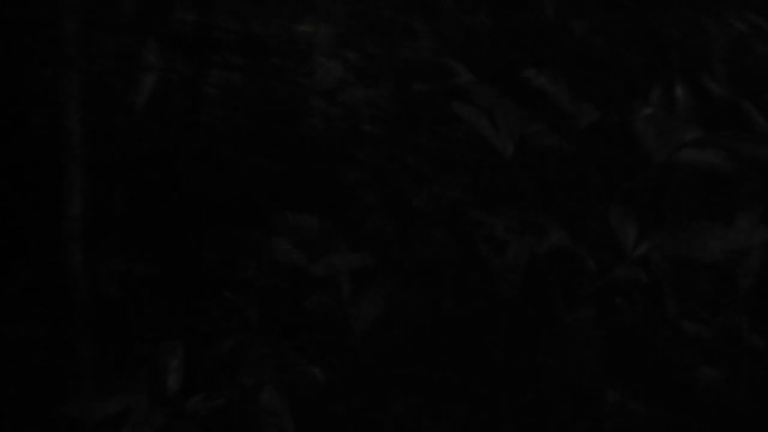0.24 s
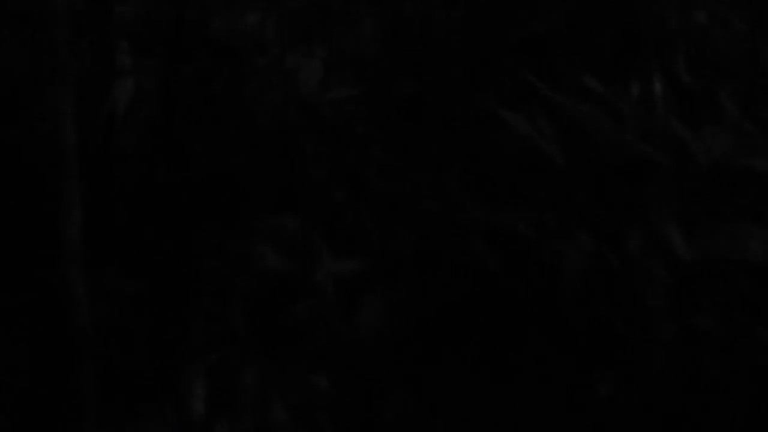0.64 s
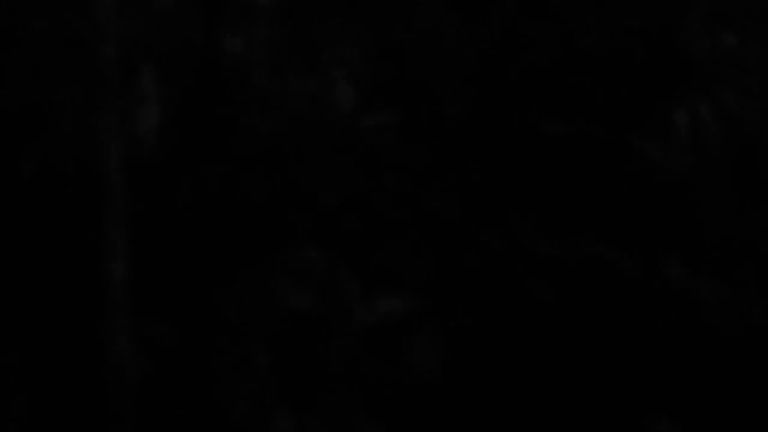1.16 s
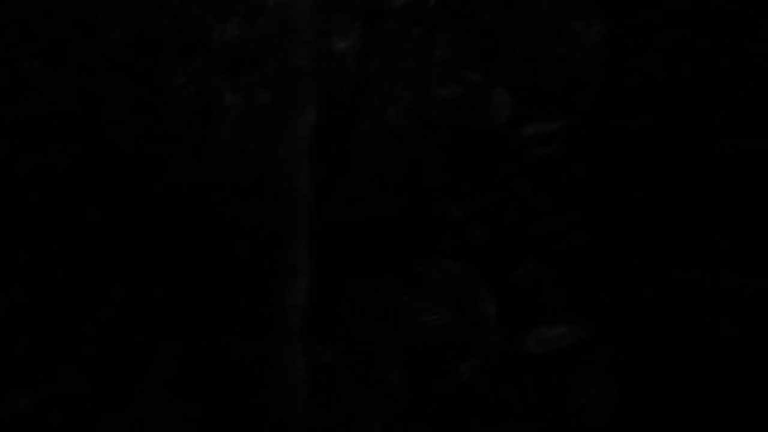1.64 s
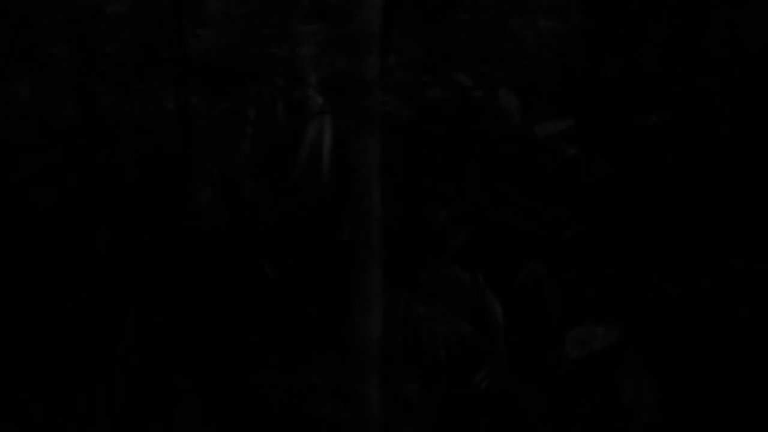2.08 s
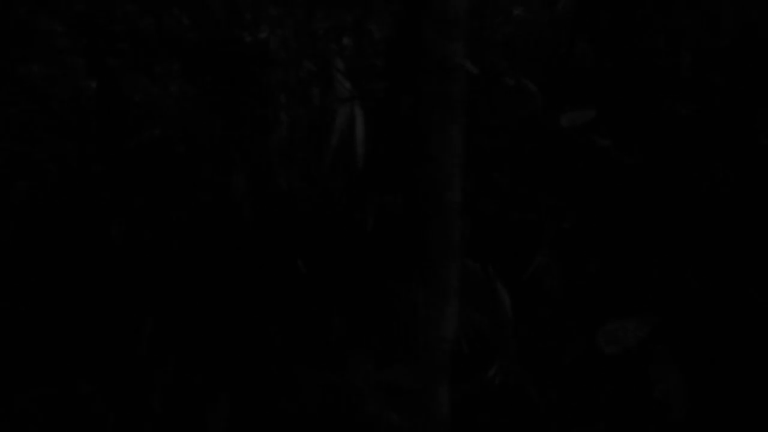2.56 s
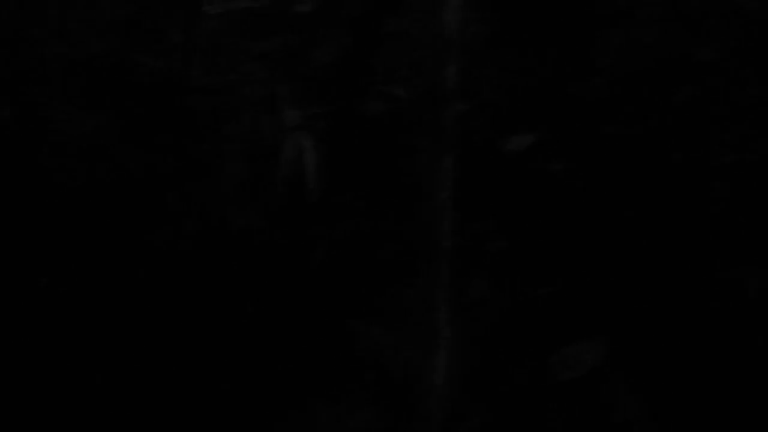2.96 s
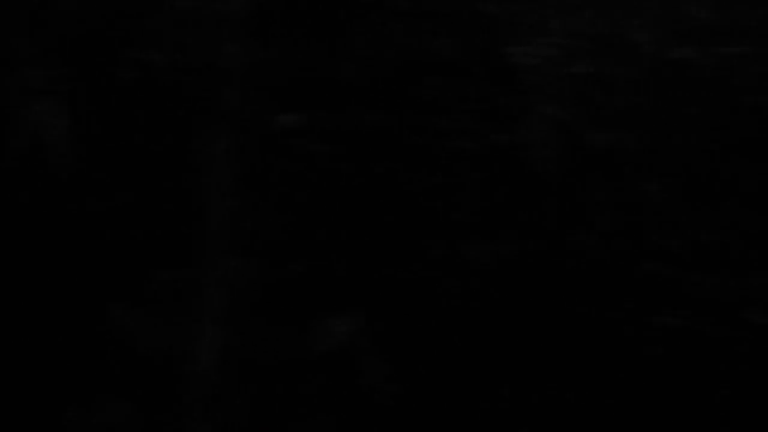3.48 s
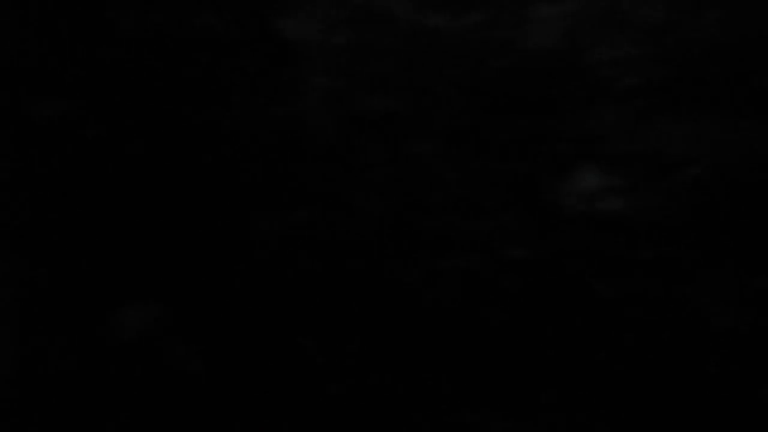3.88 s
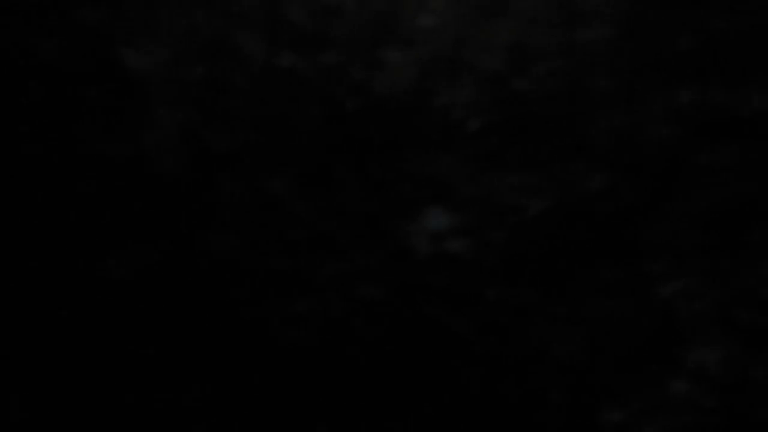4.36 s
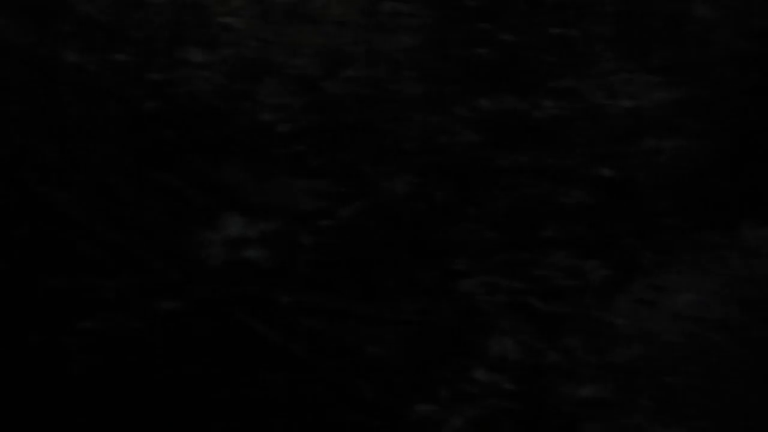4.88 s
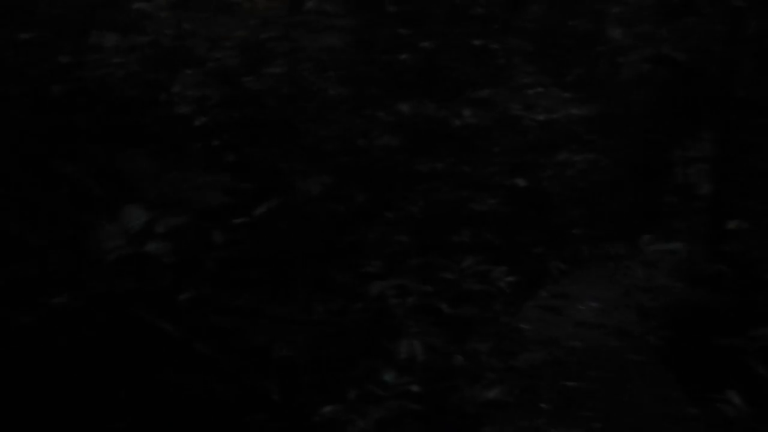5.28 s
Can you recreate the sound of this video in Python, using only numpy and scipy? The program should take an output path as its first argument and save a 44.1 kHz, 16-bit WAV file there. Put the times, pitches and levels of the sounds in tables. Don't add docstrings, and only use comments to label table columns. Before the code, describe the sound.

A near cricket trills loudly in a night rainforest, then stops, leaving fainter crickets, high chirps, hiss and small twig clicks.

```python
import sys
import numpy as np
from scipy import signal
from scipy.io import wavfile
from scipy.ndimage import uniform_filter1d

SR = 44100
rng = np.random.default_rng(int(sys.argv[2]) if len(sys.argv) > 2 else 0)


def natural_amplitude(level_db):
    exponent = np.asarray(level_db, float) / 20
    return 10 ** exponent


def digitize_waveform(pressure):
    field = np.atleast_2d(pressure).T
    bounded = np.clip(field, -1, 1)
    quanta = np.round(bounded * 32767).astype(np.int16)
    wavfile.write(sys.argv[1], SR, quanta)


N = 244314
STEP = 20
SLOW_T = np.arange(N // STEP + 1) * STEP / SR
TIME = np.arange(N) / SR

NEAR_HZ, NEAR_STROKES, NEAR_STOP_S = 4255, 92.4, 3.315
FAR_HZ, HIGH_HZ = 4270, 7050
SOUND_M_PER_S = 343
FAR_JOIN_S, FAR_HUSH_DB = 3.1, -2
TREBLE_SHARE, LOW_SHARE = 0.98, 0.55
CALM_DB = -97

# (time [s], frequency [Hz])
NEAR_WING = [(0, 4265.5), (1, 4258), (3.3, 4240.5)]
# (time [s], level [dB])
NEAR_LEVEL = [(0, -1), (.5, 0), (.8, -0.5), (1, 2), (1.4, 1.5), (1.95, 2.5), (2.5, 1), (2.75, 4),
              (2.95, 1.5), (3.3, 4)]
# (line number [1], level [dB])
NEAR_LINES = [(-3, -47), (-2, -36), (-1, -27.3), (0, -23), (1, -24), (2, -29), (3, -35.5), (4, -45),
              (5, -50), (6, -53)]
# (time [s], level [dB])
OVERTONE = [(0.0, -55), (0.51, -50), (0.58, -53), (2.57, -36), (3.31, -42.5)]
# (extra path [m], closing speed [m/s], level [dB])
PATHS = [(0.0341, -0.0179, -21.3), (0.0707, 0.0835, -18.5), (0.1168, -0.155, -18.0), (0.191, 0.1765, -13.8),
         (0.2062, 0.0617, -12.4), (0.2476, -0.4447, -23.6), (0.3266, 0.0049, -9.5), (0.3674, 0.1214, -9.1),
         (0.3717, 0.1447, -20.3), (0.3919, 0.2777, -20.1), (0.3967, -0.1072, -18.3),
         (0.4098, 0.2202, -21.5), (0.5744, 0.2597, -21.9), (0.6966, -0.0373, -17.5),
         (0.7187, -0.2595, -19.1), (0.7885, -0.3066, -17.9), (0.8718, 0.1924, -21.6),
         (1.0887, -0.3901, -22.0), (1.3211, 0.0947, -20.4), (1.3903, -0.0699, -17.9),
         (1.8104, -0.1477, -21.4), (1.8676, -0.2055, -19.0), (1.9497, 0.0037, -19.8),
         (2.5473, -0.415, -23.1), (2.6392, -0.1615, -14.6), (2.7509, -0.1703, -12.6),
         (2.7623, 0.0214, -20.6), (2.8664, -0.0308, -19.8), (2.9862, -0.304, -23.3),
         (3.6221, 0.0388, -12.5)]
# (wing tone [Hz], strokes [1/s], level before turn [dB], level after [dB], turn [s])
FAR = [
    (4258, 91.5, 0, -12, 4.4),
    (4290, 97, -1, -6, 4.6),
    (4226, 96.5, -7, 0, 4.5),
    (4285, 93, -6, -3, 4.2),
]
# (time [s], level [dB])
FAR_EARLY = [(0, -24.5), (1, -26), (2, -27), (3, -29)]
# (time [s], level [dB])
FAR_LATE = [(3.4, -26.5), (3.41, -28.5), (3.86, -26), (4.71, -31.5), (4.8, -30), (4.92, -34.5), (5.07, -33),
            (5.54, -35.5)]
# (time [s], half of left-right difference [dB])
FAR_PAN = [(3, -2), (3.5, 0.4), (4.25, -1), (4.45, 3), (4.8, 1.5), (5, 0.5), (5.3, 2)]
# (time [s], lower line level [dB], upper line level [dB])
LOW = [(0.0, -43, -42.5), (0.08, -41.5, -57), (0.35, -38, -44), (0.52, -44, -49), (1.27, -39, -40),
       (1.39, -42, -37), (1.82, -40, -43.5), (2.25, -43.5, -44.5), (2.84, -42, -46.5), (2.93, -50.5, -48.5),
       (3.39, -48, -48.5), (3.56, -62, -46), (3.66, -45, -41), (4.47, -54, -43.5), (4.72, -49, -40.5),
       (5.06, -50, -49.5), (5.52, -44, -43.5), (5.54, -51, -46)]
# (time [s], frequency [Hz])
LOW_TONE = [(0, 1577.9), (3.1, 1577.9), (3.4, 1580.2)]
# (wing tone [Hz], left-right at start [dB], drift [dB/s])
CALLERS = [
    (6850, .5, -.75),
    (6890, 1, -.6),
    (7060, -.8, -.55),
    (7205, 4.5, -1.5),
]
# (time [s], length [s], level [dB])
LOWEST = [
    (0, 0.034, -51),
    (0.399, 0.12, -35),
    (1.01, 0.13, -33.5),
    (1.26, 0.27, -38),
    (1.48, .09, -37),
    (2.2, 0.16, -41),
    (3.64, 0.096, -37.5),
    (4.299, 0.3, -34),
    (4.806, .13, -34.5),
    (4.979, 0.076, -28),
]
# (time [s], length [s], level [dB])
LOUDEST = [
    (0.628, 0.044, -30.5),
    (.83, 0.064, -26.5),
    (1.811, 0.071, -26.5),
    (2.02, .16, -29),
    (2.689, 0.11, -26),
    (3.05, 0.13, -28.5),
    (3.518, 0.1, -26.5),
    (4.02, 0.051, -30),
    (4.19, 0.092, -24),
    (5.37, 0.15, -31.5),
]
# (time [s], length [s], level [dB])
MIDDLE = [(0, 0.029, -34.5), (.14, 0.058, -35.5), (0.329, 0.12, -32.5), (0.798, 0.095, -31),
          (1.02, 0.082, -33), (1.299, 0.071, -32), (2.29, 0.15, -37.5), (2.48, 0.12, -32.5),
          (2.73, 0.14, -34), (3.09, 0.12, -34), (3.331, 0.14, -29.5), (3.991, 0.13, -31),
          (4.229, 0.185, -32.5), (4.461, 0.088, -28.5), (4.641, 0.22, -53), (4.932, 0.19, -32.5),
          (5.17, 0.17, -28.5), (5.43, 0.1, -43)]
# (time [s], length [s], level [dB])
HIGHEST = [(.12, 0.054, -32.5), (0.571, 0.1, -37), (0.767, 0.057, -31.5), (1.032, 0.16, -36.5),
           (1.51, 0.075, -37), (1.661, 0.15, -31.5), (2.58, 0.22, -36), (2.781, 0.056, -34.5),
           (3.04, 0.11, -30), (3.521, 0.086, -32), (3.801, 0.17, -34.5), (4.129, 0.11, -31),
           (4.47, 0.16, -37), (4.69, 0.15, -36), (5.08, 0.23, -40), (5.43, .11, -37)]
# (time [s], level [dB])
FAINT = [(0, -48), (.3, -46), (.6, -46), (.9, -47), (1.1, -52), (1.3, -75)]
# (frequency [Hz], density [dB/Hz])
HISS = [(40, -40), (90, -39), (130, -14), (250, -1.5), (450, -0.5), (1000, -2.5), (3000, -3.5),
        (3800, -2.5), (5000, -3.5), (5900, -6), (7600, -6), (9500, -10.5), (13000, -16), (15700, -20.5)]
# (frequency [Hz], coherence [1])
SAME = [(60, 0.28), (130, 0.66), (290, 0.94), (640, 0.88), (1410, 0.83), (3100, 0.62), (6820, 0.27),
        (15000, 0.044)]
# (time [s], level [dB])
STIR = [(0, -5), (.21, -1), (1.17, 1.5), (1.5, -1), (1.96, 2), (2.13, -2.5), (2.3, 1.5), (3.9, -0.1),
        (4.94, -3.5), (5.54, 4.5)]
# (time [s], peak level [dB], rise [s], fall [s])
GUSTS = [
    (.21, -53.5, 0.14, 0.33),
    (1.17, -59.5, 0.2, 0.35),
    (1.96, -43.5, 0.15, 0.069),
    (5.5, -72, .6, .3),
]
# (time [s], peak level [dB], pitch [Hz], ring t60 [s])
DRIPS = [(0.198, -28.5, 1000, 0.019), (0.686, -30, 437, 0.03), (0.995, -26, 466, 0.026),
         (1.278, -32, 850, 0.02), (1.338, -29.5, 1060, 0.012), (1.495, -35, 500, 0.025),
         (1.656, -27.5, 430, 0.017), (1.674, -20, 460, 0.019), (1.711, -32, 435, 0.04),
         (1.845, -31, 1260, 0.02), (1.917, -32, 342, 0.025), (2.241, -39, 785, 0.022),
         (2.34, -38, 615, 0.025), (2.637, -30, 458, 0.026), (2.679, -30.5, 910, 0.022),
         (3.346, -34, 440, 0.039), (3.493, -25.5, 270, 0.03), (3.626, -24.5, 383, 0.021),
         (3.814, -33, 1070, 0.021), (4.067, -34, 355, 0.03), (4.13, -37, 483, 0.02),
         (4.782, -33.5, 616, 0.028)]
# (time [s], peak level [dB], pitch [Hz], ring t60 [s])
TICKS = [(1.1004, -24, 3580, 0.0035), (1.2805, -25, 2590, 0.0035), (2.168, -27, 3400, 0.0035),
         (2.324, -22, 3480, 0.0035), (2.554, -24, 2220, 0.0033), (3.376, -10, 3480, 0.0041),
         (3.377, -21, 5140, 0.004), (3.647, -19, 2930, 0.0035), (3.739, -29, 2280, 0.02),
         (3.9893, -26, 3390, 0.0035), (4.444, -22, 2680, 0.0035), (5.343, -20, 2550, 0.0031),
         (5.3926, -30, 3490, 0.0035)]
# (time [s], peak level [dB], rustle relative to it [dB], rustle length [s])
SNAPS = [(0.372, -29, -14, 0.016), (0.4479, -41, -14, 0.03), (0.516, -32, -10.5, 0.033),
         (0.905, -37.5, -17, 0.03), (1.085, -25.5, -12.5, 0.039), (1.278, -25, -16, 0.036),
         (1.396, -40, -14, 0.028), (1.615, -22, -23, 0.027), (1.718, -27, -13, 0.031),
         (1.964, -36, -14, 0.024), (2.567, -24, -17, 0.039), (3.204, -26, -16, 0.03),
         (3.377, -29, -17, 0.026), (3.647, -21.5, -12.5, 0.041), (3.745, -28, -25, 0.026),
         (3.983, -33, -16, 0.033), (4.114, -30, -11, 0.03), (4.414, -35, -14, 0.03),
         (4.438, -20.5, -20, 0.032), (5.113, -38, -14, 0.03), (5.394, -30, -14, 0.026),
         (5.5204, -33, -15, 0.03)]
# (time [s], peak level [dB], centre frequency [Hz])
BREAKS = [(.6622, -21, 1900), (0.6643, -36, 500), (.6776, -27, 1700), (0.6784, -24, 1700),
          (0.6824, -18.5, 1400), (0.684, -19, 900), (0.691, -39, 600), (.6965, -25, 1020),
          (.699, -23, 1200), (0.702, -31, 800), (.9965, -26, 900), (1.001, -25, 1200), (1.6745, -29, 910),
          (1.252, -34, 1500), (1.282, -32, 1200), (1.3422, -27, 1200), (1.348, -26, 1100),
          (1.499, -35, 910), (1.833, -21, 1500), (1.8429, -13, 1290), (1.8472, -24, 1100),
          (1.851, -26, 1200), (1.8607, -17, 1800), (2.3426, -24, 1500), (2.446, -28, 1200),
          (2.459, -25, 700), (2.5534, -21, 1400), (3.3623, -29, 3120), (3.453, -24, 1200),
          (3.588, -27, 1000), (5.2172, -21, 1300), (5.256, -27, 1000), (5.298, -31, 605), (5.348, -30, 500),
          (5.394, -29, 1000), (5.452, -28, 900), (5.529, -27, 900), (5.5325, -22, 1200)]
# (time [s], length [s], level [dB], centre frequency [Hz])
CRACKLES = [(0.686, 0.035, -40, 800), (1.846, 0.012, -49, 1100), (2.341, 0.12, -46, 450),
            (2.435, 0.056, -42, 500), (2.587, 0.022, -41.5, 426), (2.653, 0.0085, -43, 520),
            (3.426, 0.025, -49, 397), (3.493, 0.0093, -36, 700), (3.646, 0.02, -38.5, 800),
            (4.444, 0.024, -41, 800), (1.956, 0.011, -47, 95), (5.247, 0.073, -48, 597)]


def evened(x):
    return x / np.sqrt(np.mean(abs(x) ** 2) + 1e-20)


def curve(rows, t, order=1):
    rows = np.array(rows, float)
    return np.interp(t, rows[:, 0], rows[:, order])


def spectrum(rows, hz):
    rows = np.array(rows)
    return np.interp(np.log(hz + 1), np.log(rows[:, 0]), rows[:, 1])


def add(mix, s, sound):
    part = mix[:, round(s * SR):][:, :sound.shape[1]]
    part += sound[:, :part.shape[1]]


def drift(width_hz, order=4):
    hz = np.fft.fftfreq(len(SLOW_T), STEP / SR)
    z = rng.standard_normal((len(hz), 2)) @ [1, 1j]
    return evened(np.fft.ifft(z / (1 + abs(2 * hz / width_hz) ** order)))


def turning(hz):
    return np.exp(2j * np.pi * hz * SLOW_T)


def carry(base, hz):
    full = signal.resample(base, base.shape[1] * STEP, axis=1)[:, :N]
    cycles = np.cumsum(hz * np.ones(N)) / SR
    return np.sqrt(2) * (full * np.exp(2j * np.pi * cycles)).real


def trill(lines, strokes, start, sweep, wander, blur, blur_hz, apart):
    base = np.zeros((2, len(SLOW_T)), complex)
    for k, gain in lines:
        cycles = k * (strokes * SLOW_T + start) + sweep * k * k + wander * drift(3.0).real
        steady = np.exp(2j * np.pi * cycles)
        shared = 1 + blur * drift(blur_hz)
        echo = drift(4.9)
        side = apart * (.35 * echo.real + 1.3j * echo.imag) * shared
        base += gain * steady * np.array([shared + side, shared - side])
    return base


def through_leaves(hz):
    total = 0
    for metres, speed, db in PATHS:
        cycles = (NEAR_HZ * speed * SLOW_T - hz * metres) / SOUND_M_PER_S
        total = total + natural_amplitude(db) * np.exp(2j * np.pi * cycles)
    return total


def near_cricket():
    on = natural_amplitude(-60 * np.maximum(SLOW_T - NEAR_STOP_S, 0) / 0.22)
    level_db = curve(NEAR_LEVEL, SLOW_T)
    lines = [(k, natural_amplitude(db + level_db) * through_leaves(NEAR_HZ + k * NEAR_STROKES)) for k, db in NEAR_LINES]
    body = trill(lines, NEAR_STROKES, start=.72, sweep=.07, wander=.02, blur=.13, blur_hz=60, apart=.45)
    body += natural_amplitude(-37.0) * np.array([drift(1040.0), drift(620.0)]) * turning(330)

    lines = [(k, np.exp(-.5 * ((k - 1.1) / 2.44) ** 2)) for k in range(-4, 8)]
    smear = np.interp(SLOW_T, [.7, 1.9], [2.2, .4])
    top = trill(lines, NEAR_STROKES, start=0.72, sweep=0.039, wander=0.052,
                blur=smear, blur_hz=78.6, apart=0.25)
    top = evened(top) * natural_amplitude(curve(OVERTONE, SLOW_T)) * on ** 2

    wing = curve(NEAR_WING, TIME)
    song = carry(body * on, wing) + carry(top, 2 * wing) + natural_amplitude(-21) * carry(top, 3 * wing)
    return natural_amplitude([[1.8], [-2.6]]) * song


def far_crickets():
    base = 0
    for hz, strokes, before_db, after_db, turn in FAR:
        lines = [(k, np.exp(-.5 * ((k - .1) / 1.73) ** 2) + 0.011) for k in range(-4, 6)]
        one = trill(lines, strokes, start=rng.random(), sweep=0.042, wander=0.59,
                    blur=0.98, blur_hz=39.0, apart=0.5)
        level_db = np.interp(SLOW_T, [turn - .2, turn + 0.25], [before_db, after_db])
        if strokes > 95:
            level_db = level_db + FAR_HUSH_DB * np.clip(FAR_JOIN_S - SLOW_T, 0, 1)
        base = base + natural_amplitude(level_db) * one * turning(hz - FAR_HZ)
    power = uniform_filter1d((abs(base) ** 2).mean(0), size=500)
    pan_db = curve(FAR_PAN, SLOW_T)
    level_db = curve([*FAR_EARLY, *FAR_LATE], SLOW_T)
    base *= natural_amplitude(level_db + np.array([pan_db, -pan_db])) / np.sqrt(power)
    return carry(base, FAR_HZ)


def low_trill():
    lower = natural_amplitude(curve(LOW, SLOW_T, order=1) + 0.8)
    upper = natural_amplitude(curve(LOW, SLOW_T, order=2) + 0.8)
    below = natural_amplitude(-17) * lower + natural_amplitude(-63)
    above = natural_amplitude(np.interp(SLOW_T, [2, 3, 4.5, 5], [-59, -52, -57, -59]))
    lines = [(-1, below), (0, lower), (1, upper), (2, above)]
    base = trill(lines, 98.7, start=.02, sweep=.01, wander=.3, blur=.36, blur_hz=65, apart=.25)
    pan_db = np.interp(SLOW_T, [2.8, 4.8], [-2.6, -.4])
    return carry(base * natural_amplitude([pan_db, -pan_db]), curve(LOW_TONE, TIME))


def high_callers():
    haze = np.array([drift(320.0, order=2), drift(350.0, order=2)])
    base = natural_amplitude(-37.0) * haze * turning(6900 - HIGH_HZ)
    shared, left, right = (drift(73.0, order=2) for _ in range(3))
    t = SLOW_T[:1500] - .01
    beats = 1 + 0.082 * np.cos(2 * np.pi * 28 * t)
    for (hz, pan_db, slide_db), chirps in zip(CALLERS, (LOWEST, LOUDEST, MIDDLE, HIGHEST)):
        steady = .3 if hz > 7000 else .45
        partner = 1 + (hz < 7000) * 0.18 * np.exp(-2j * np.pi * 90 * t)
        tone = beats * partner * np.exp(2j * np.pi * (hz - HIGH_HZ) * t)
        for s, length, db in chirps:
            at = rng.integers(0, len(SLOW_T) - len(t))
            cut = slice(at, at + len(t))
            fading = steady + shared[cut] + 1.11 * np.array([left[cut], right[cut]])
            after = np.maximum(t - length, 0)
            decay = 0.58 * natural_amplitude(-60 * after / 0.058) + 0.51 * natural_amplitude(-60 * after / 1.0)
            shape = np.clip(t / 0.014 + .5, 0, 1) * decay
            half_db = .5 * (pan_db + slide_db * s)
            pan = natural_amplitude(db - 4.0 + half_db * np.array([[1], [-1]]))
            add(base, s / STEP, pan * shape * fading * tone)
    faint = 1.7 * np.array([drift(130., order=2), drift(130., order=2)])
    faint = faint * (1 + 0.24 * np.cos(2 * np.pi * 14 * SLOW_T)) * natural_amplitude(curve(FAINT, SLOW_T))
    return carry(base, HIGH_HZ) + carry(faint, 7890)


def hiss():
    frames = N // 128 + 5
    hz = np.fft.rfftfreq(512, 1 / SR)[:, None]
    a, b, c, d, patches = rng.standard_normal((frames, 257, 5)).T
    patches = evened(uniform_filter1d(uniform_filter1d(patches, 8, 0), 14, 1))
    flicker = evened(uniform_filter1d(rng.standard_normal(frames), 5))
    stir = curve(STIR, np.arange(frames) * 128 / SR)
    treble = 1 / (1 + (5500 / (hz + 1)) ** 4)
    low = 1 / (1 + (hz / 1300) ** 3)
    level_db = spectrum(HISS, hz) + 1.43 * patches
    level_db += treble * (TREBLE_SHARE * stir + 1.3 * flicker) + low * LOW_SHARE * stir
    same = np.clip(spectrum(SAME, hz), -1, 1)
    left = a + 1j * b
    right = same * left + np.sqrt(1 - same ** 2) * (c + 1j * d)
    z = np.array([left, right]) * natural_amplitude(level_db)
    return natural_amplitude(-36) * evened(signal.istft(z, nperseg=512, noverlap=384)[1][:, :N])


def wind():
    band = signal.butter(2, [45, 105], "band", fs=SR, output="sos")
    air = evened(signal.sosfilt(band, rng.standard_normal((2, N))))
    level = natural_amplitude(CALM_DB)
    for s, db, rise, fall in GUSTS:
        level = level + natural_amplitude(db) * np.exp(-abs(TIME - s) / np.where(TIME < s, rise, fall))
    return air * level * natural_amplitude([[3.], [-1.5]])


def drips():
    out, t = np.zeros((2, N)), np.arange(2000) / SR
    for s, db, hz, t60 in [*DRIPS, *TICKS]:
        ring = np.sin(2 * np.pi * hz * t) * natural_amplitude(-60 * t / max(t60, .002))
        ring *= 1 - np.exp(-t * hz * 1.64)
        bounces = np.zeros(700)
        bounces[rng.integers(60, 700, 4)] = rng.uniform(-0.049, 0.31, 4)
        bounces[0] = 1
        add(out, s + 0.000874, natural_amplitude(db + 4.0) * np.convolve(ring, bounces) * np.ones((2, 1)))
    return out


def snaps():
    out, t = np.zeros((2, N)), np.arange(-3000, 4000) / SR
    bright = signal.butter(1, [4500, 10000], "band", fs=SR)
    for s, db, rustle_db, length in SNAPS:
        noise = rng.standard_normal((3, len(t)))
        swell = np.exp(-(t / np.where(t < 0, .6, 1) / max(length, .003)) ** 2)
        tick = (t >= 0) * np.exp(-abs(t) / 0.00091)
        stereo = noise[0] + 0.83 * noise[1:]
        sound = signal.lfilter(*bright, stereo * (tick + natural_amplitude(rustle_db) * swell))
        add(out, s - 3000 / SR, natural_amplitude(db + 2.0) * sound)
    return out


def breaks():
    out = np.zeros((2, N))
    for s, db, hz in BREAKS:
        band = signal.butter(2, [hz / 1.85, hz * 1.68], "band", fs=SR)
        click = signal.lfilter(*band, np.arange(400) == 0)
        add(out, s - .0003, -natural_amplitude(db) * click / abs(click).max() * np.ones((2, 1)))
    return out


def crackles():
    out, n = np.zeros((2, N)), np.arange(4000)
    for s, length, db, hz in CRACKLES:
        chance, size = rng.random((2, 4000))
        clicks = (chance < 900 / SR) * natural_amplitude(-22 * size)
        clicks *= np.sign(size % .1 - .05)
        clicks = clicks * (n < length * SR) + (n == 0)
        band = signal.butter(2, [hz / 1.9, hz * 1.6], "band", fs=SR)
        sound = evened(signal.lfilter(*band, clicks)) * np.sqrt(length * SR / 4000)
        add(out, s, natural_amplitude(db) * sound * np.ones((2, 1)))
    return out


def scene():
    insects = near_cricket() + far_crickets() + low_trill() + high_callers()
    return insects + hiss() + wind() + drips() + snaps() + breaks() + crackles()


def band_limit(x):
    return signal.sosfilt(signal.butter(12, 15730, fs=SR, output="sos"), x)


def record(dry):
    bass_cut = signal.butter(2, 55, "high", fs=SR, output="sos")
    edge = signal.firwin(511, 15670, window=("kaiser", 9), fs=SR)
    mix = signal.oaconvolve(signal.sosfilt(bass_cut, dry), edge[None], "same")
    return band_limit(mix)


dry = scene()
out = record(dry)
digitize_waveform(out)
```